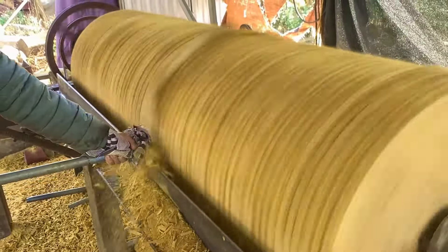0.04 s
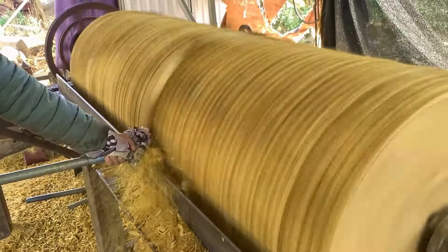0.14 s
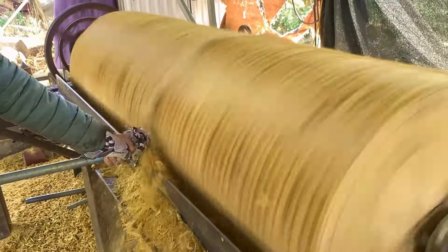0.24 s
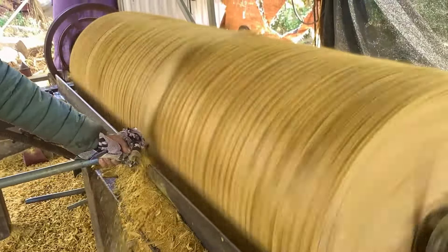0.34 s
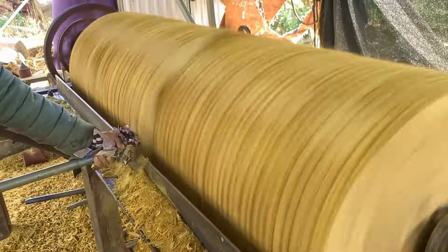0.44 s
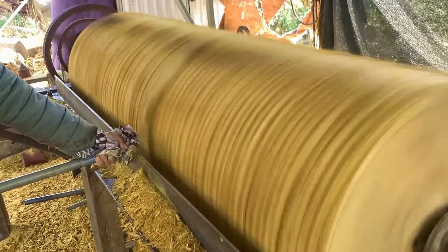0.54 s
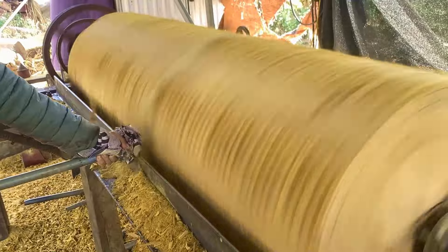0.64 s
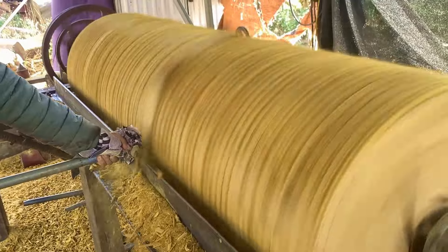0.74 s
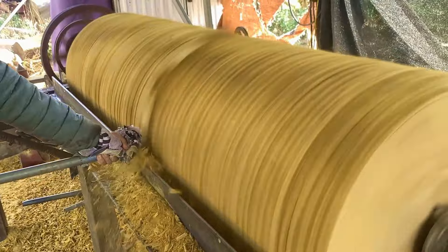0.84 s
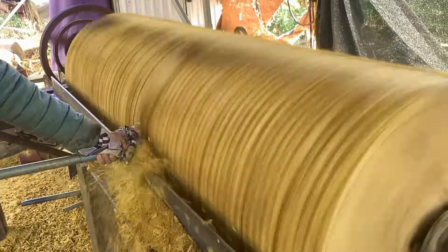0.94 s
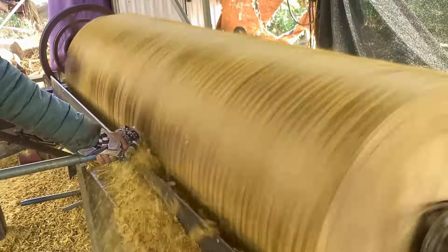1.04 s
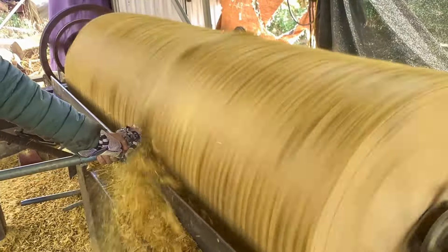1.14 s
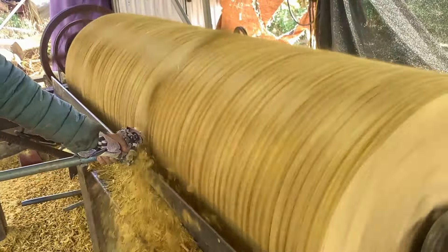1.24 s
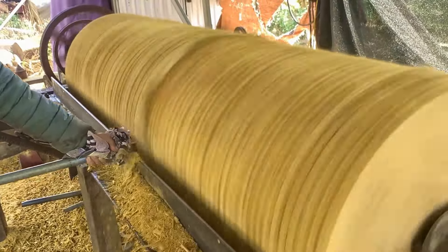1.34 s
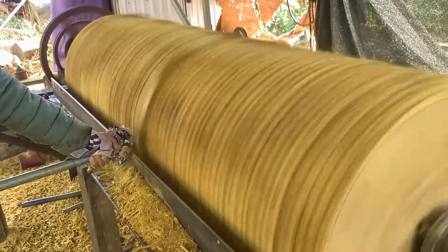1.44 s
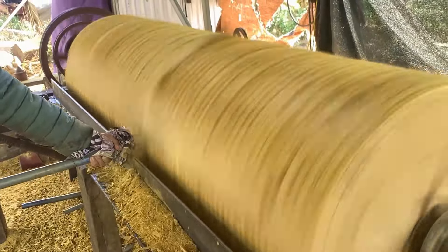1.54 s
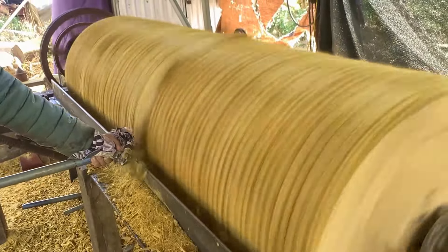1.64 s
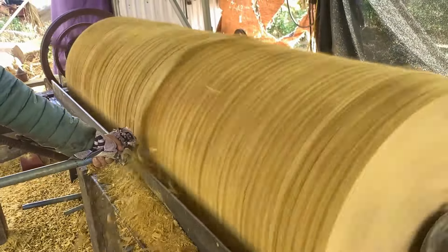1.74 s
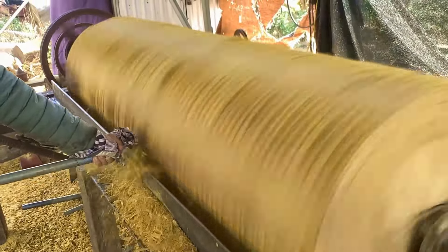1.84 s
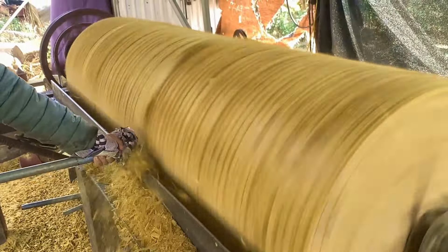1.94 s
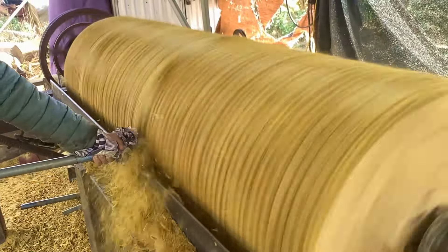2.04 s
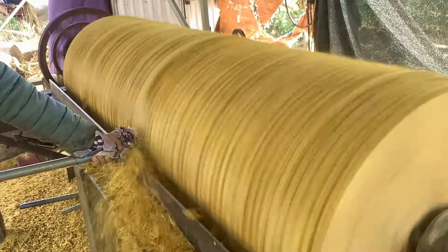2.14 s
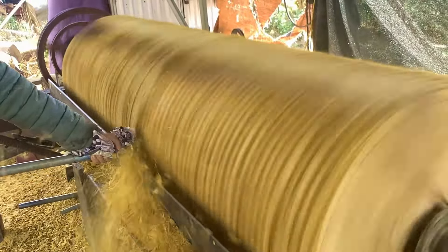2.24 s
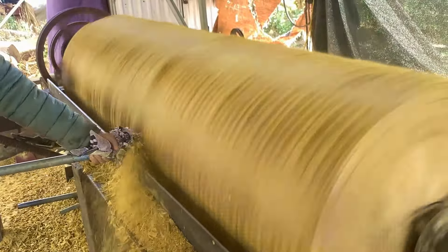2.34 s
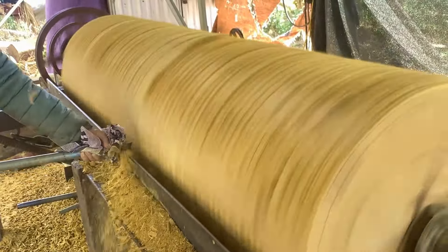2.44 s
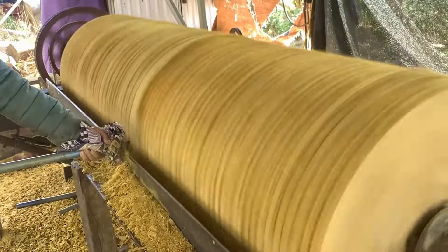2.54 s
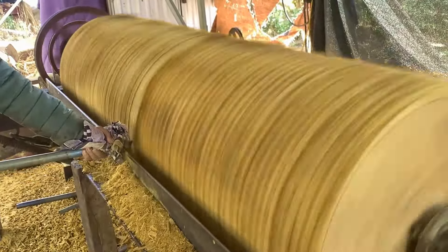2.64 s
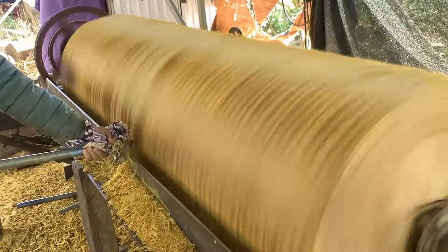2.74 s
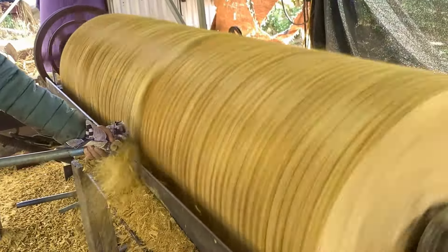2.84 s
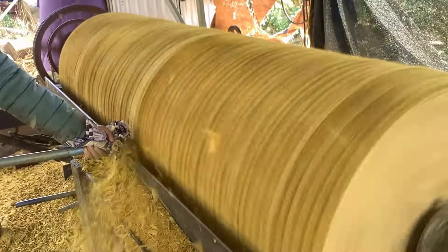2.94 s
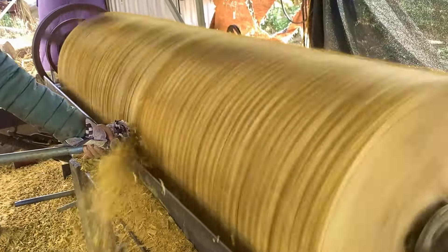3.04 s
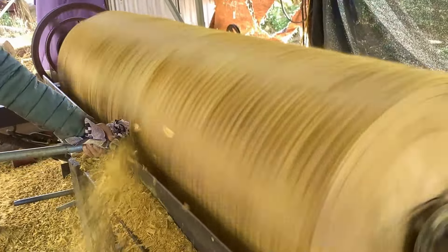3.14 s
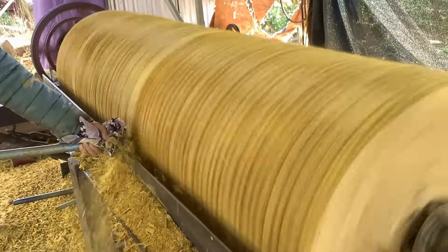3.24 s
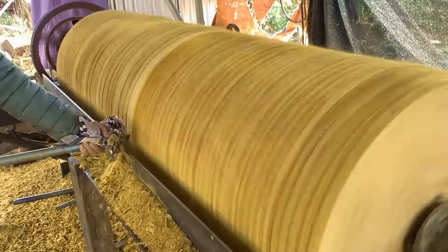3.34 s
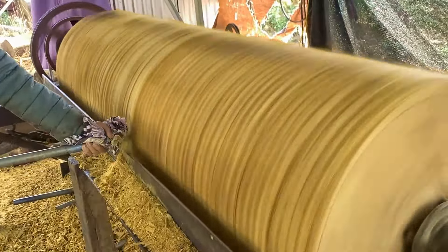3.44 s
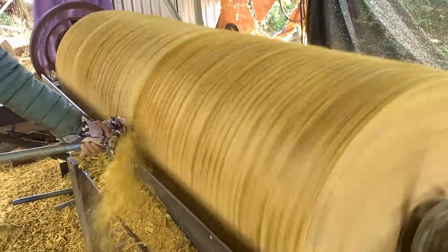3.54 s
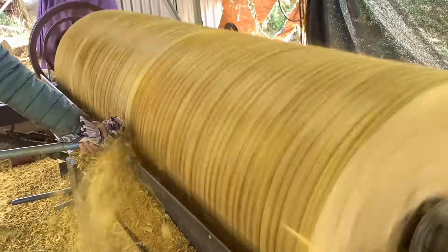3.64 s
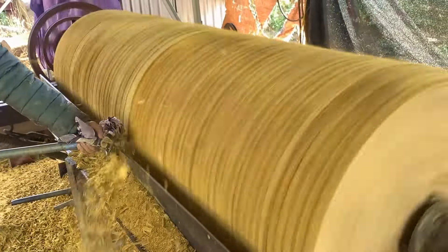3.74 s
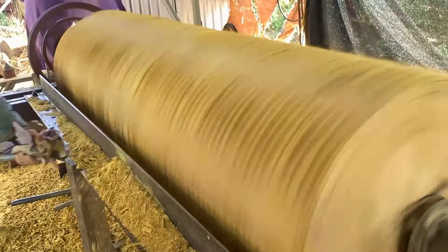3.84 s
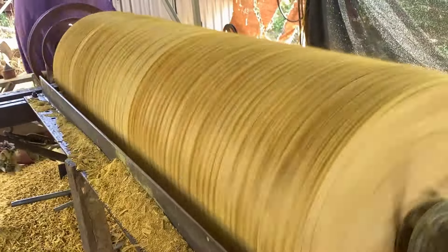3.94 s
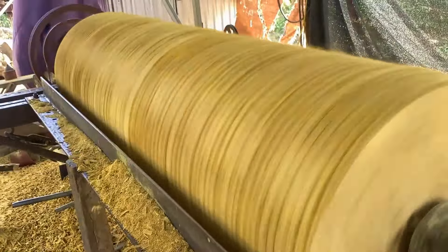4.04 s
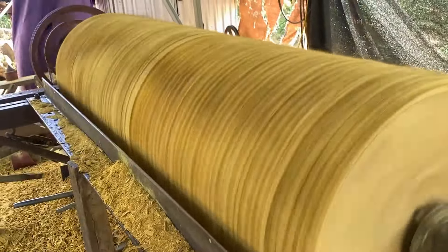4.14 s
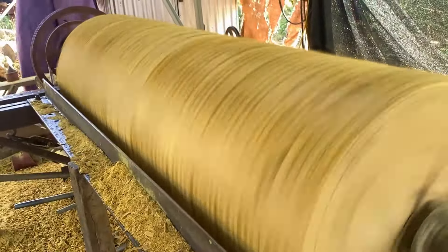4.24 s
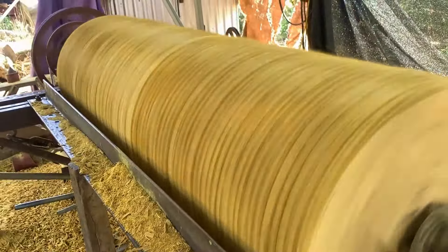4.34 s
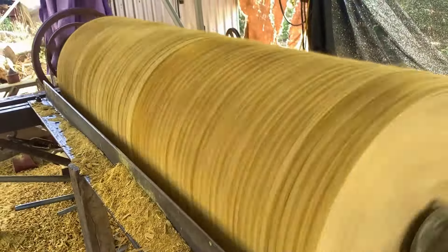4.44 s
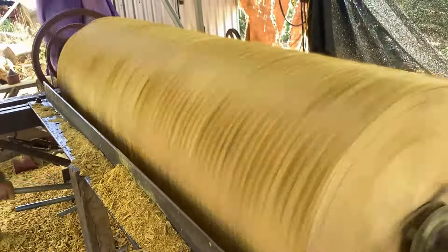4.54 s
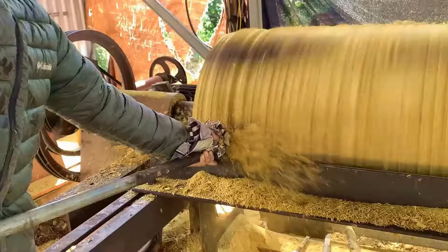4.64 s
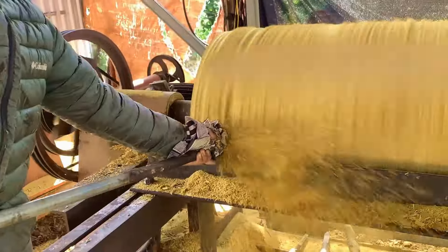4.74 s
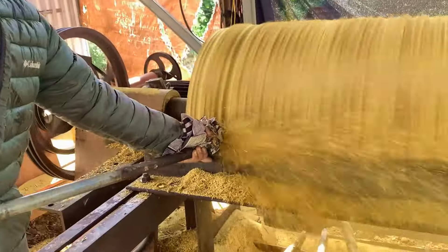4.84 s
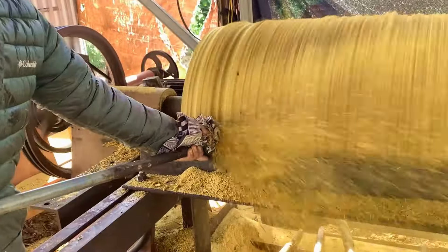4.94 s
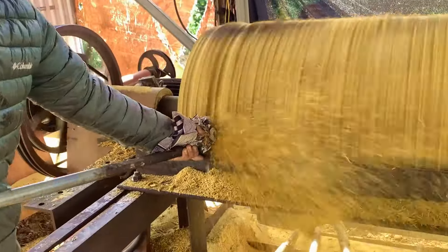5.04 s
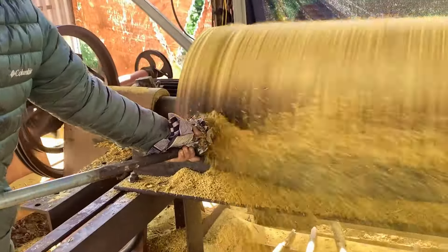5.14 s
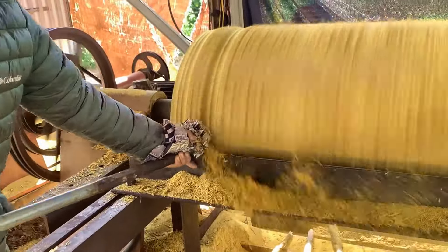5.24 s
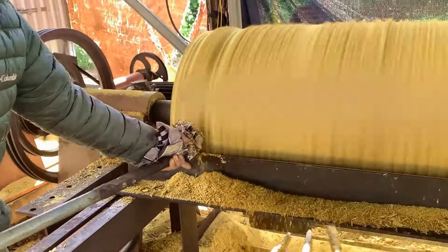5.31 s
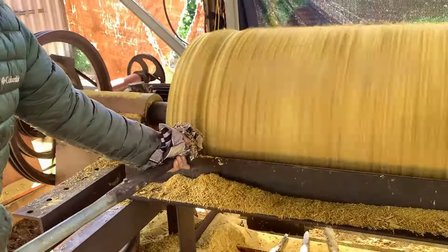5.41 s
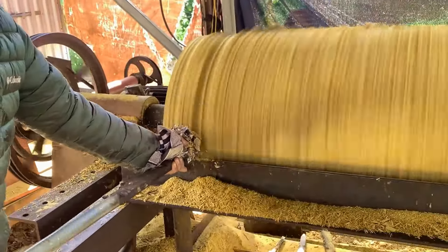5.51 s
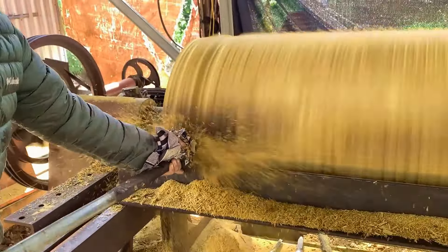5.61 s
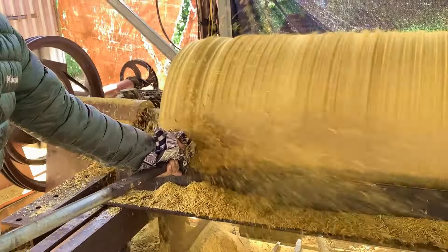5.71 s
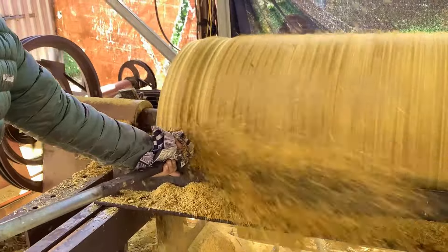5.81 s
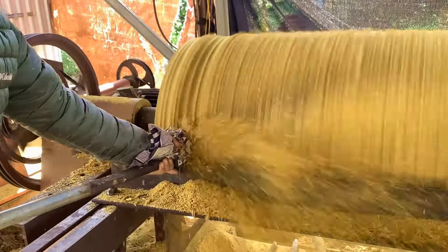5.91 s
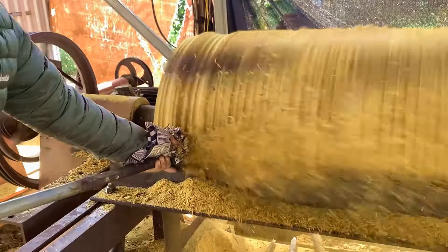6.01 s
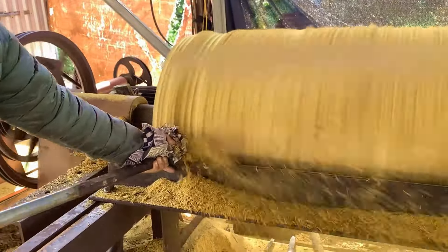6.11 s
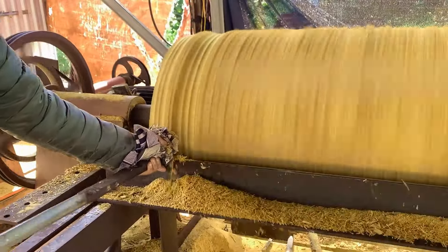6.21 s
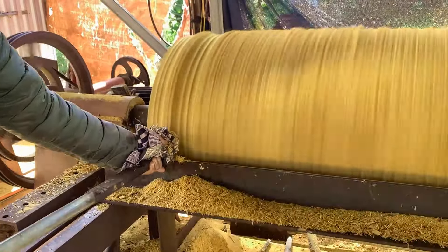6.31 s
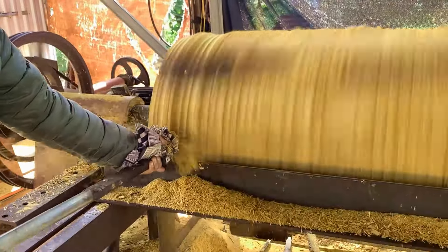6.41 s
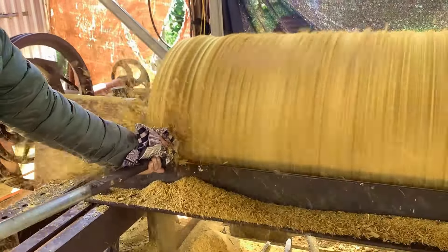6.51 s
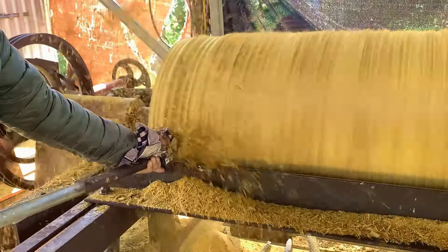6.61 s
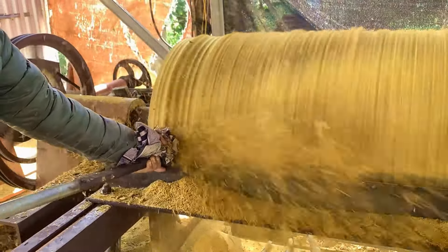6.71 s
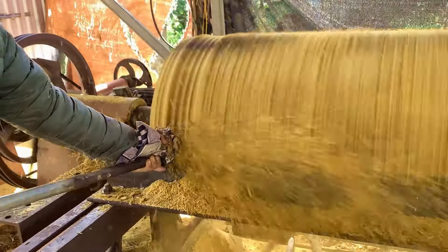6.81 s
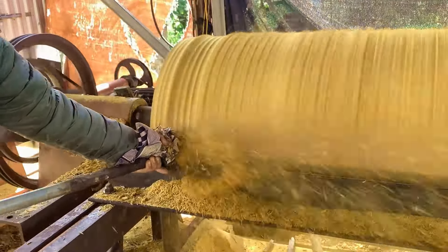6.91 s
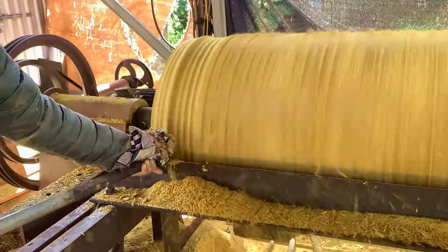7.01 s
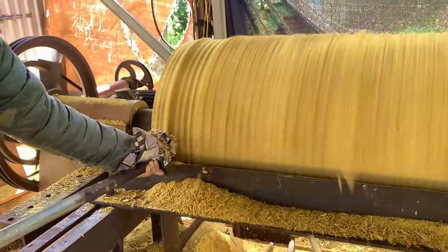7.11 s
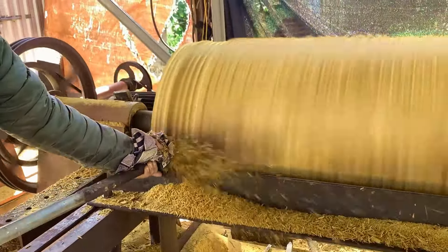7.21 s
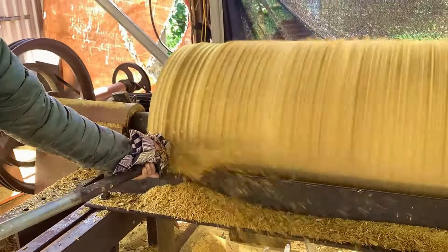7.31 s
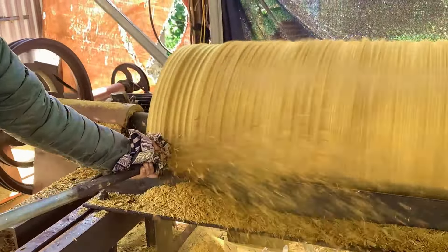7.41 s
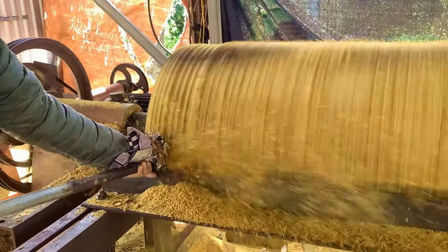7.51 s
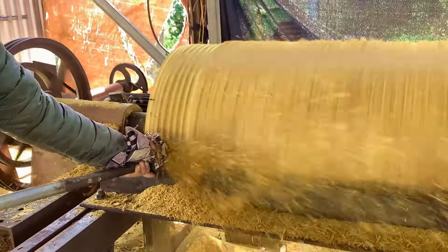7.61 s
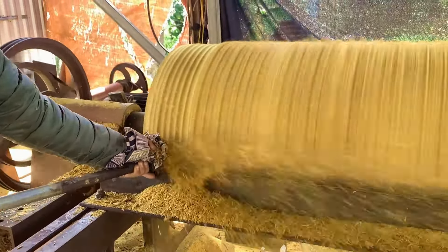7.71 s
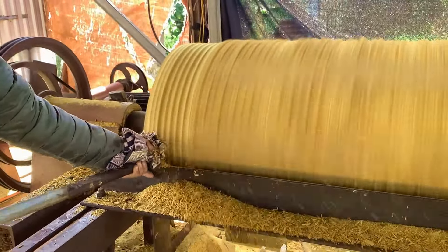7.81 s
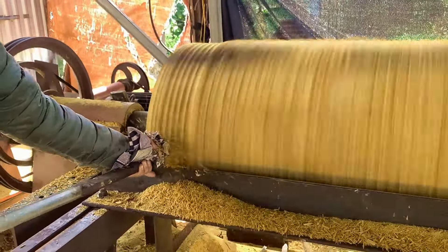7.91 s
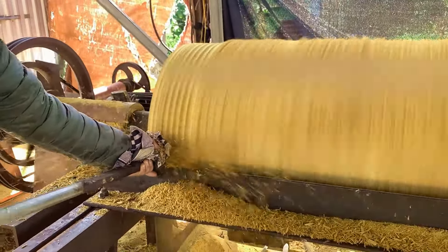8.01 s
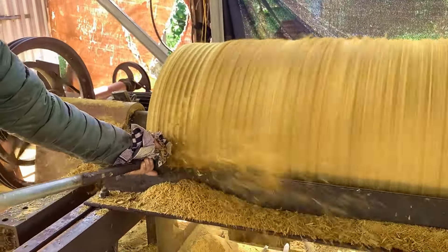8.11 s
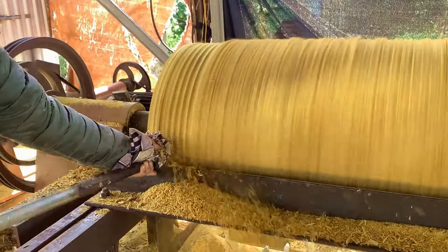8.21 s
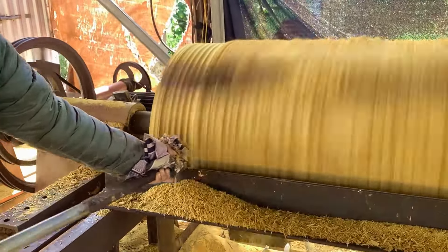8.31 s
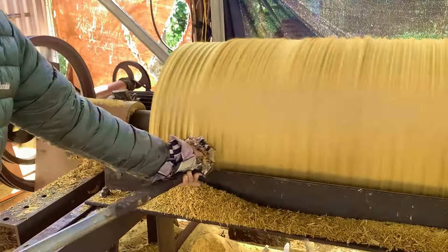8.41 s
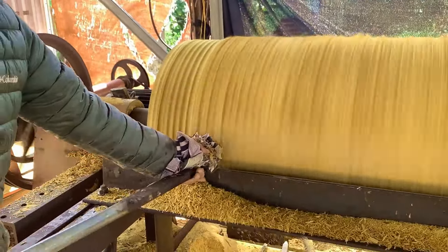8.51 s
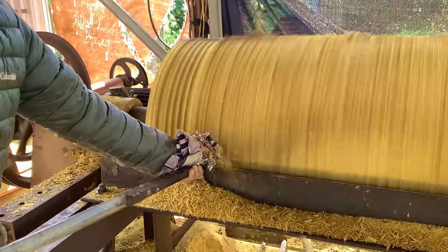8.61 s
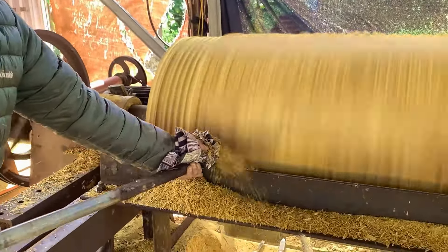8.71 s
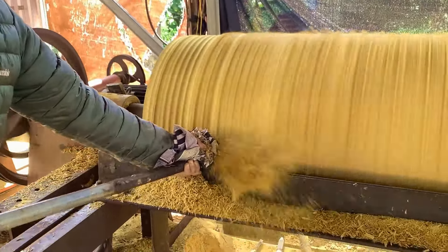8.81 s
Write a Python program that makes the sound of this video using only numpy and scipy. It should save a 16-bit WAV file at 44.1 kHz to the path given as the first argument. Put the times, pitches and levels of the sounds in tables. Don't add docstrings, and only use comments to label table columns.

```python
import sys
import numpy as np
from scipy import signal
from scipy.fft import rfft, irfft
from scipy.io import wavfile

SR = 44100
rng = np.random.default_rng(int(sys.argv[2]) if len(sys.argv) > 2 else 0)


def dump(signal):
    limited = np.clip(np.atleast_2d(signal).T, -1, 1)
    pcm = np.round(limited * 32767).astype(np.int16)
    wavfile.write(sys.argv[1], SR, pcm)


def linear_from_db(decibels):
    return 10 ** (np.asarray(decibels, float) / 20)


N = 390726


def rasp(cut_db, bright_db, spectrum, gouge, ring_db, flutter_db, wander_db):
    size = len(cut_db)
    tear = fibres(size, per_s=12000, spread_db=2.0)
    tear = tear * wobble(size, flutter_db, 20) * wobble(size, 1.0, 147)
    smooth = body(linear_from_db(cut_db - 2.5) * tear, spectrum, gouge, ring_db, wander_db)
    high_pass = signal.butter(1, 5000, "high", fs=SR, output="sos")
    treble = signal.sosfilt(high_pass, smooth)
    return patchy(smooth + (linear_from_db(bright_db) - 1) * treble, spread_db=0.98)


def fibres(size, per_s, spread_db):
    sizes = linear_from_db(spread_db * np.minimum(rng.exponential(1, size), 5))
    sizes = sizes * rng.choice([-1, 1], size)
    return rms_one(sizes * (rng.random(size) < per_s / SR))


def patchy(x, spread_db):
    out = x.copy()
    for hz in 1500 * 2 ** np.arange(0, 3.4, 1 / 3):
        band_pass = signal.butter(1, [hz / 1.12, hz * 1.12], "band", fs=SR, output="sos")
        out += (wobble(len(x), spread_db, 3.23) - 1) * signal.sosfilt(band_pass, x)
    return out


def cut(t, passes, grip, depth_db_per_s, shallow_s):
    bite_db_per_s, lift_db_per_s = 1499.5, 749
    dust_db, dust_db_per_s = -25.5, 103
    shallow_dull_db = -9
    rest_follows, rest_lag_s, rest_full_db = 0.31, 0.023, -22.5

    touch, lift, touch_db, lift_db, bright_db = np.transpose(passes)[:, :, None]
    part = np.clip((t - touch) / (lift - touch), 0, 1)
    arch_db = depth_db_per_s * (lift - touch) * np.sqrt(np.sin(np.pi * part).clip(0))
    held = touch_db + (lift_db - touch_db) * part + arch_db
    late = np.maximum(t - lift, 0)
    fall = np.maximum(-lift_db_per_s * late, dust_db - dust_db_per_s * late)
    level = held + fall - bite_db_per_s * np.maximum(touch - t, 0)
    depth = np.clip(np.minimum(t - touch, lift - t) / shallow_s, 0, 1)
    pick = level.argmax(axis=0), np.arange(len(t))
    cut_db = level[pick]

    r = np.exp(-1 / (rest_lag_s * SR))
    load = signal.lfilter([1 - r], [1, -r], linear_from_db(cut_db - rest_full_db), zi=[1.])[0]
    grip_db = np.interp(t, *np.transpose(grip))
    rest_db = grip_db + rest_follows * 20 * np.log10(load + 0.0022)
    return cut_db, (bright_db + shallow_dull_db * (1 - depth))[pick], rest_db


def rib_knocks():
    # first knock in seconds, last in seconds, first, middle and last level in dB.
    runs = [
        (4.765, 5.247, -12.5, -5, -14),
        (5.5680, 6.128, -20, -7, -12.5),
        (6.448, 7.009, -15, -6.5, -11.5),
        (7.2480, 7.8012, -26.5, -8, -12),
        (7.96, 8.274, -11.5, -8, -12),
        (8.587, 8.8167, -34.5, -18.5, -15),
    ]
    rib_s, t60_s, spread_db = .08, .07, 1.5
    knocks = []
    for first_s, last_s, *arch_db in runs:
        part = np.linspace(0, 1, round((last_s - first_s) / rib_s) + 1)
        level_db = np.polyval(np.polyfit([0, .5, 1], arch_db, deg=2), part)
        level_db += spread_db * rng.standard_normal(len(part))
        knocks += [(first_s + p * (last_s - first_s), db, t60_s) for p, db in zip(part, level_db)]
    return knocks


def catches(t, knocks, rise_s, snap_db, lead_s):
    swell, snaps = np.zeros(len(t)), np.zeros(len(t))
    after = np.arange(SR // 3) / SR
    for s, peak_db, t60_s in knocks:
        at = round((s - lead_s - t[0]) * SR)
        shape = (1 - np.exp(-after / rise_s)) ** 2 * linear_from_db(peak_db - 60 * after / t60_s)
        swell[at:at + len(after)] += shape[:len(t) - at]
        snaps[at + np.argmax(shape)] = linear_from_db(peak_db + snap_db)
    return swell * fibres(len(t), per_s=8000, spread_db=2.5) + snaps


def knocking(hits, spectrum, gouge, level_db, ring_db, thud_db):
    # mode in Hz, width in Hz, level in dB.
    log_modes = [(745.5, 35, 3), (903, 42, -4), (290.4, 3.7, 4), (243, 29, -14.5)]
    late = np.r_[np.zeros(round(.006 * SR)), hits][:len(hits)]
    thud = resonate(late, log_modes, 1.5)
    crack = body(hits, spectrum, gouge, ring_db, 5.5)
    return linear_from_db(level_db) * crack + linear_from_db(thud_db) * thud


def tool_rest(rest_db, spectrum, modes, ring_db):
    shake = rng.standard_normal(len(rest_db)) * wobble(len(rest_db), 3.05, 24)
    return body(linear_from_db(rest_db) * shake, spectrum, modes, ring_db, 1.67)


def thumps(t):
    # start in seconds, pitch in Hz, peak in dB.
    bumps = [
        (5.346, 111, -22.5),
        (6.242, 123, -21.5),
        (7.123, 210, -16),
    ]
    out = np.zeros(len(t))
    for s, hz, peak_db in bumps:
        cycles = np.maximum(t - s, 0) * hz
        fade = cycles * np.exp(-1.6 * cycles ** 1.15)
        out += linear_from_db(peak_db + 1.0) * fade * np.sin(2 * np.pi * cycles)
    return out


def drone(size, spectrum, whines, level_db, whine_db):
    noise = rng.standard_normal((2, size)) * wobble(size, .8, 13)
    mid, side = (body(n, spectrum, whines, whine_db, 4.8) for n in noise)
    return linear_from_db(level_db) * np.array([1.05 * mid + 0.45 * side, 1.19 * mid - 0.68 * side])


def motor_tones(t):
    # pitch in Hz, rms level in dB.
    tones = [(301.5, -66), (465.5, -68), (1147, -67), (2293, -78)]
    out = np.zeros(len(t))
    for hz, level_db in tones:
        gain = np.sqrt(2) * linear_from_db(level_db) * wobble(len(t), 1.475, 2.91)
        out += gain * np.sin(2 * np.pi * hz * t)
    return out


def shed(x, width, tail_db):
    # frequency in Hz, lean to the right in dB.
    lean_right = [(60, -19), (250, -12), (500, -11.5), (900, -11), (8000, -30), (12000, -17)]
    t60_s = 0.14
    side = x
    for lag_s in (.0011, .0023, .0037):
        gap = np.zeros(round(lag_s * SR) - 1)
        side = signal.lfilter(np.r_[-.55, gap, 1], np.r_[1, gap, -.55], side)
    side = colour(side, width) - colour(x, lean_right)
    t = np.arange(SR // 3) / SR
    tails = rng.standard_normal((2, len(t))) * linear_from_db(-60 * t / t60_s) * (t > .006)
    tails = signal.lfilter([.5], [1, -.3], tails / np.sqrt(np.sum(tails[0] ** 2)))
    wet = signal.oaconvolve(x[None], tails, axes=1)[:, :len(x)]
    return np.array([x + side, x - side]) + linear_from_db(tail_db) * wet


def rms_one(x):
    return x / np.sqrt(np.mean(x ** 2) + 1e-20)


def wobble(size, spread_db, rate_hz):
    hop = 40
    r = np.exp(-2 * hop * np.pi * rate_hz / SR)
    slow = signal.lfilter([1], [1, -2 * r, r * r], rng.standard_normal(size // hop + 1002))[1000:]
    return np.interp(np.arange(size) / hop, np.arange(len(slow)), linear_from_db(spread_db * rms_one(slow)))


def colour(x, points):
    size = 4096
    hz, level_db = np.transpose(points)
    log_hz = np.log(np.arange(size // 2 + 1) * SR / size + 1)
    response_db = np.interp(log_hz, np.log(hz), np.maximum(level_db, -70))
    cepstrum = irfft(response_db * np.log(10) / 20)
    cepstrum[1:size // 2] *= 2
    cepstrum[size // 2 + 1:] = 0
    impulse = irfft(np.exp(rfft(cepstrum)))[:size // 2]
    return signal.oaconvolve(x, impulse)[:len(x)]


def resonate(x, modes, wander_db):
    out = np.zeros(len(x))
    for k, (hz, width_hz, level_db) in enumerate(modes):
        r = np.exp(-np.pi * width_hz / SR)
        drive = x * linear_from_db(level_db) * wobble(len(x), wander_db, 4.2) + 1e-18
        zeros = [(1 - r * r) / 2, 0, (r * r - 1) / 2]
        poles = [1, -2 * r * np.cos(2 * np.pi * hz / SR), r * r]
        out += (-1) ** k * signal.lfilter(zeros, poles, drive)
    return out


def body(drive, spectrum, modes, ring_db, wander_db):
    def sound(x, db):
        return colour(x, spectrum) + linear_from_db(ring_db) * resonate(x, modes, db)
    return sound(drive, wander_db) / np.std(sound(rng.standard_normal(SR // 2), 0))


def beside_log(t):
    # touch in seconds, lift in seconds, rasp at touch in dB, at lift in dB, extra treble in dB.
    passes = [(0.0, 0.016, -15, -25, 10), (0.042, 0.093, -34, -35.5, 5), (0.101, 0.135, -20, -26.5, 11),
              (0.135, 0.409, -28, -26, -1.5), (0.565, 0.6, -42, -48, -2), (0.627, 0.678, -40, -37.5, -6),
              (0.713, 0.872, -24, -26, -6.5), (0.845, 1.363, -25.5, -29.5, 0.5),
              (1.622, 1.663, -31, -37, -11), (1.684, 2.386, -35, -25, 0.5), (2.352, 2.502, -26, -32, -1.5),
              (2.793, 2.966, -51, -21, -1.5), (2.95, 3.06, -21.5, -42, 6), (3.061, 3.349, -30.5, -32, 6.5),
              (3.485, 3.66, -54, -39, 14.5), (3.653, 3.805, -24.5, -23.5, 0.5)]
    # time in seconds, level in dB.
    grip = [(0, -40), (0.45, -47), (0.75, -39), (1.0, -36.5), (1.35, -47), (2.25, -39), (2.6, -60),
            (3.0, -46.5), (3.75, -48)]
    # time in seconds, peak in dB.
    snags = [(0.1087, -9), (0.545, -38), (0.5692, -25), (0.624, -24.5), (0.7033, -17.5), (0.7237, -12.5),
             (1.0285, -6.5), (1.073, -19), (1.5178, -31.5), (1.558, -31.5), (1.6162, -32), (1.679, -25),
             (2.747, -38), (2.8218, -34), (2.8603, -39), (2.9624, -4), (3.0792, -13), (3.2735, -8),
             (3.482, -30), (3.5268, -41), (3.671, -11), (3.8058, -22.5)]
    # frequency in Hz, level in dB.
    rasp_colour = [(530, -22.5), (900, -5.5), (1700, -5), (2800, 0), (3300, -5.5), (4050, -1), (4800, -17),
                   (6150, -8), (8400, 2), (11000, -6.5), (13900, -8), (15600, -15)]
    knock_colour = [(600, -39), (1500, -5), (2800, 3), (5000, -3), (8500, 1.5), (12000, -18), (15700, -10)]
    rest_colour = [(24, -74), (40, -50.5), (190, -8), (236, -17), (297, 1.5), (381, -6.5), (444, 0.5),
                   (674, -3), (1600, -17.5), (2080, -41.5), (3520, -120)]
    drone_colour = [(15, -82), (25, -64), (69, -9.5), (173, -4), (198, -11.5), (399, -9), (509, -16),
                    (848, -18.5), (919, -12), (1170, -14.5), (1410, -14.5), (1570, -13), (15500, -47.5)]
    # frequency in Hz, level in dB.
    soft_colour = [(3900, -1), (4700, -0.5), (5300, -1)]
    # frequency in Hz, width in Hz, level in dB.
    gouge_modes = [(1480, 49, -12), (1690, 110, -11), (2000, 33, -12), (2460, 42, -6), (2770, 50, -5),
                   (4130, 150, -11), (4590, 85, -17), (5050, 56, -14), (5560, 50, -4), (5860, 35, -13),
                   (6440, 92, -11), (7180, 140, -7), (7390, 75, -7), (7600, 26, -8), (8140, 23, -5),
                   (8400, 94, 0), (8630, 39, -1), (9490, 53, -4), (10000, 69, -3), (10200, 41, -4),
                   (10500, 23, -11), (10700, 31, -10), (11100, 39, -6), (11400, 41, -7), (11700, 44, -11),
                   (12600, 100, -16), (13600, 140, -15)]
    rest_modes = [(194, 21, -11), (264.6, 9.2, -6), (300.9, 4, 0.5), (458, 21, 0), (733.4, 19, -6)]
    whines = [(210, 9.8, -2), (512, 23, 1), (603, 20, 0), (940, 12, 0), (1024, 12, -0.5), (1292, 26, 2)]
    # frequency in Hz, side against mid in dB.
    image_width = [(60, -3.5), (110, -6.5), (200, -16.5), (380, -39), (700, -16.5), (1290, -7), (2380, -13),
                   (4400, -1.5), (8120, 0), (15000, 1.5)]

    cut_db, bright_db, rest_db = cut(t, passes, grip, depth_db_per_s=10, shallow_s=0.047)
    knocks = [(s, peak_db, .14) for s, peak_db in snags]
    hits = catches(t, knocks, rise_s=0.00097, snap_db=11.0, lead_s=0.0008)
    work = rasp(cut_db, bright_db, rasp_colour, gouge_modes, ring_db=14.0, flutter_db=0.55, wander_db=4)
    work += knocking(hits, knock_colour, gouge_modes, level_db=-14, ring_db=8, thud_db=-11)
    work = colour(work, soft_colour)
    work += tool_rest(rest_db, rest_colour, rest_modes, ring_db=8)
    motor = drone(len(t), drone_colour, whines, level_db=-57, whine_db=-5.5)
    return shed(work, image_width, tail_db=-4) + motor + motor_tones(t)


def near_motor(t):
    # touch in seconds, lift in seconds, rasp at touch in dB, at lift in dB, extra treble in dB.
    passes = [
        (4.651, 5.325, -33, -35.5, 4.6),
        (5.562, 6.202, -31.5, -34.5, 3.3),
        (6.389, 6.422, -44, -41, 6.1),
        (6.431, 7.034, -28.5, -36, 3.6),
        (7.23, 7.83, -31.5, -32.5, 1.1),
        (7.95, 8.288, -32.5, -30.5, 1),
        (8.587, 8.641, -53, -55.5, 7.6),
        (8.662, 8.718, -38, -31, 5),
        (8.704, 8.993, -32, -40, 2.7),
    ]
    # time in seconds, level in dB.
    grip = [(4.73, -34.5), (5.5, -38), (6.7, -37.5), (7.3, -51.5), (7.8, -40.5), (8.05, -50.5),
            (8.25, -42.5), (8.7, -47.5), (8.86, -29.5)]
    # frequency in Hz, level in dB.
    rasp_colour = [(500, -22.5), (900, -2.5), (1600, -11.5), (2400, -1), (3400, -3), (4700, -0.5),
                   (5700, -5), (8000, -1), (10500, -8.5), (13500, -13.5), (15600, -5)]
    knock_colour = [(500, -22), (900, -7), (1600, 4.5), (2400, 7.5), (4500, -2.5), (8500, -2),
                    (15700, -11.5)]
    rest_colour = [(40, -38.5), (120, -15.5), (288, 0), (418, 1), (520, -31.5), (1000, -13), (1600, -25.5),
                   (2500, -61.5)]
    drone_colour = [(25, -45), (110, -0.5), (300, -8), (520, -6), (830, -17), (1080, -5.5), (1800, -14.5),
                    (2400, -15), (2800, -24.5), (4500, -29.5), (8000, -34.5), (15500, -47)]
    # frequency in Hz, width in Hz, level in dB.
    gouge_modes = [(1580, 98, -7), (2060, 47, -1), (2260, 33, -3), (2450, 20, -5), (3080, 160, -11),
                   (3590, 39, -6), (4200, 100, -7), (4550, 160, -4), (4800, 79, -4), (5460, 42, 0),
                   (5790, 81, -4), (6140, 76, -3), (6570, 52, -5), (6890, 94, -4), (7640, 35, -6),
                   (8190, 130, -6), (8850, 32, -9), (11400, 39, -16), (11900, 58, -16), (13800, 150, -13)]
    rest_modes = [(236, 11.7, -8), (295.1, 7.6, 6), (409, 42, -5.5), (748, 25, -5.5)]
    whines = [(474, 2.4, -32), (1110, 15, -5.5), (1067, 6, -18)]
    # frequency in Hz, side against mid in dB.
    image_width = [(60, -17), (150, -30.5), (380, -33), (950, -5.5), (2380, -6), (5980, 1.5), (15000, -2)]
    swell_db, swell_s = 3.5, 0.0081

    cut_db, bright_db, rest_db = cut(t, passes, grip, depth_db_per_s=12.5, shallow_s=.12)
    ribs = rib_knocks()
    rib_s = np.array([s for s, _, _ in ribs])
    nearest = np.searchsorted((rib_s[1:] + rib_s[:-1]) / 2, t)
    cut_db = cut_db + swell_db * np.exp(-((t - rib_s[nearest]) / swell_s) ** 2)
    hits = catches(t, ribs, rise_s=0.0045, snap_db=10.5, lead_s=0.0045)
    work = rasp(cut_db, bright_db, rasp_colour, gouge_modes, ring_db=11.0, flutter_db=1.22, wander_db=2.5)
    work += knocking(hits, knock_colour, gouge_modes, level_db=-5.0, ring_db=2.0, thud_db=6)
    work += tool_rest(rest_db, rest_colour, rest_modes, ring_db=6.0) + thumps(t)
    motor = drone(len(t), drone_colour, whines, level_db=-47, whine_db=4.5)
    return shed(work, image_width, tail_db=-5.0) + motor + linear_from_db(6.5) * motor_tones(t)


def scene():
    move_s, fade_out_s, fade_in_s = 4.724, 0.0083, 0.0016
    t = np.arange(N) / SR
    before, after = t[t < move_s], t[t >= move_s]
    first = beside_log(before) * np.clip((move_s - before) / fade_out_s, 0, 1)
    second = near_motor(after) * np.clip((after - move_s) / fade_in_s, 0, 1)
    return np.hstack([first, second])


def band_limit(x):
    return signal.sosfilt(signal.butter(12, 15770, fs=SR, output="sos"), x)


def record(dry):
    low_cut = signal.butter(2, 77, "high", fs=SR, output="sos")
    top_cut = signal.cheby2(10, 50, 16300, fs=SR, output="sos")
    mix = signal.sosfilt(top_cut, signal.sosfilt(low_cut, dry))
    return band_limit(mix)


dry = scene()
out = record(dry)
dump(out)
```